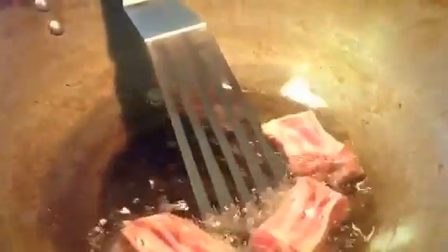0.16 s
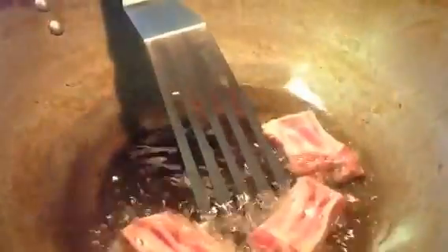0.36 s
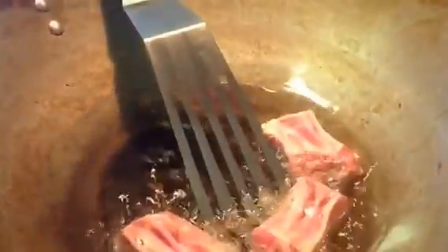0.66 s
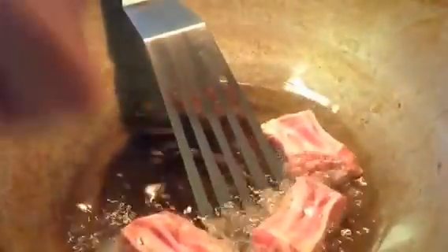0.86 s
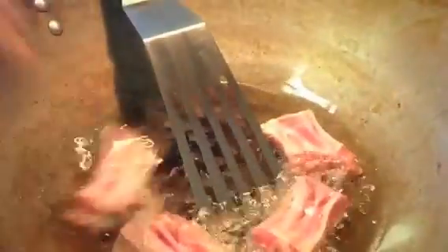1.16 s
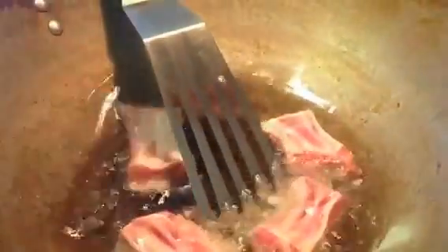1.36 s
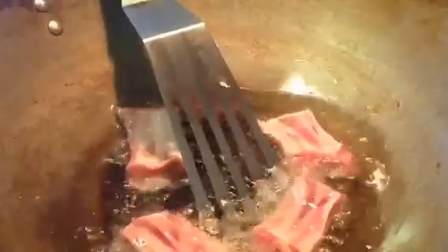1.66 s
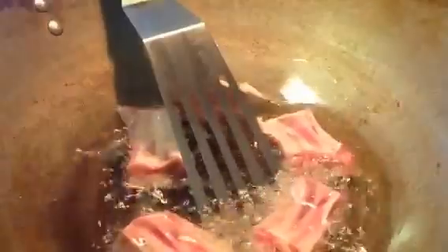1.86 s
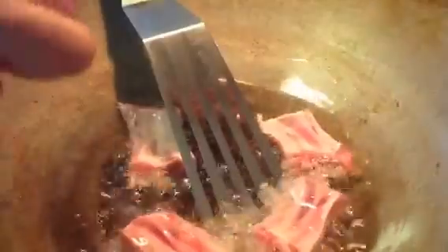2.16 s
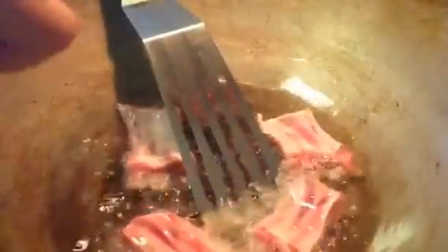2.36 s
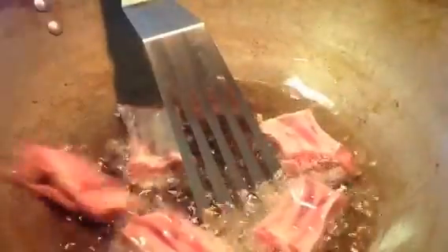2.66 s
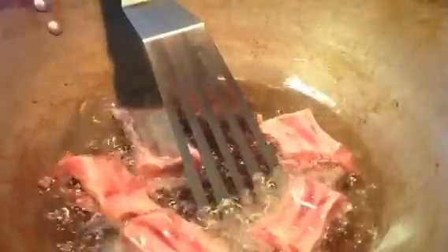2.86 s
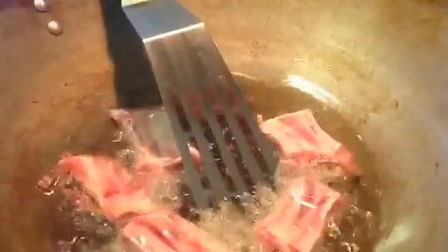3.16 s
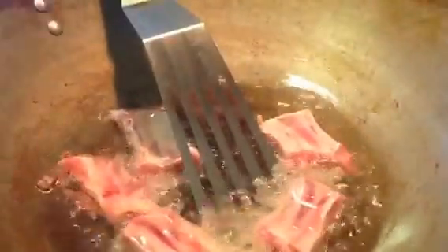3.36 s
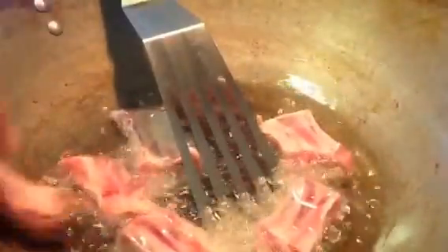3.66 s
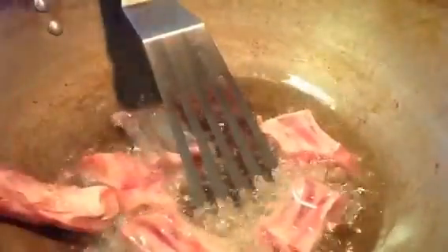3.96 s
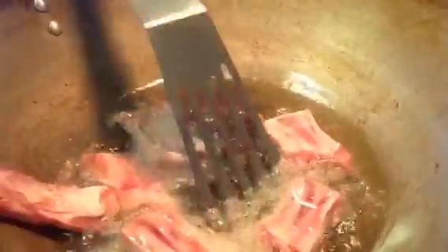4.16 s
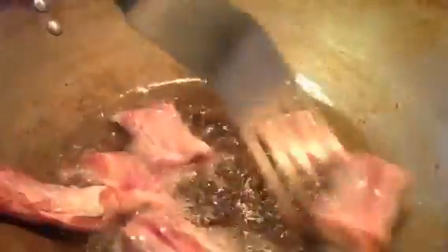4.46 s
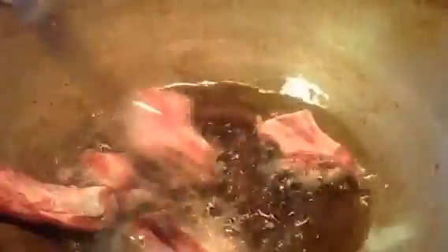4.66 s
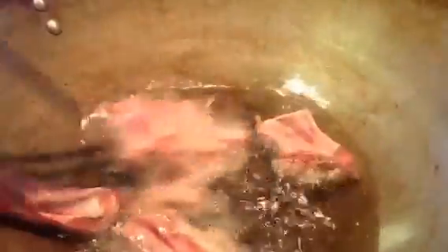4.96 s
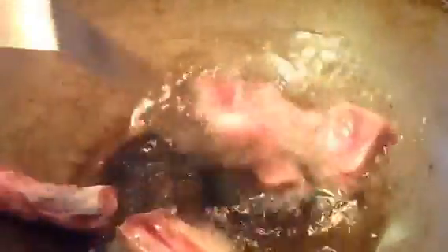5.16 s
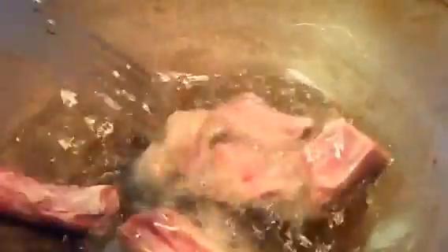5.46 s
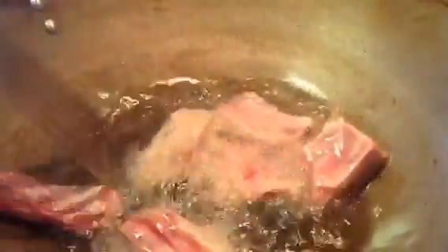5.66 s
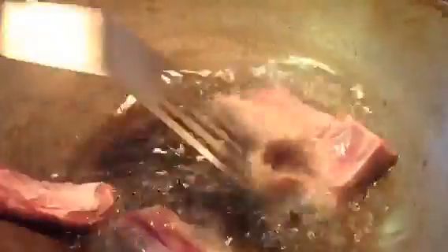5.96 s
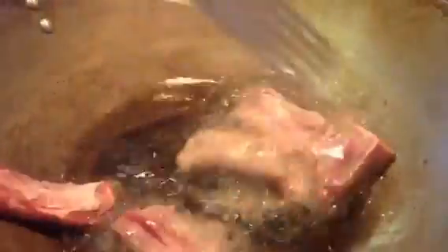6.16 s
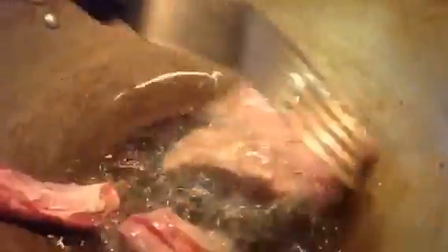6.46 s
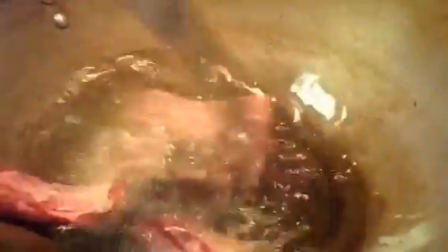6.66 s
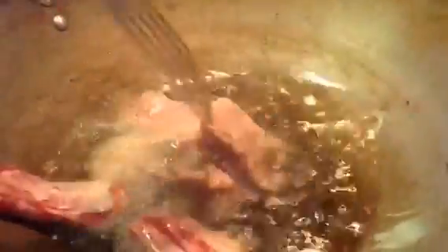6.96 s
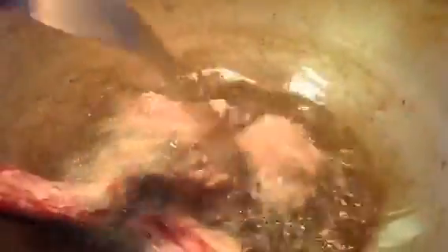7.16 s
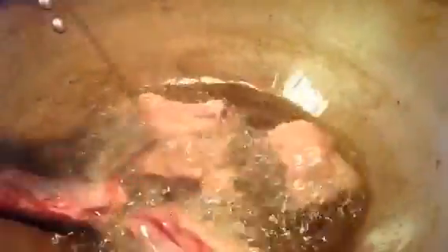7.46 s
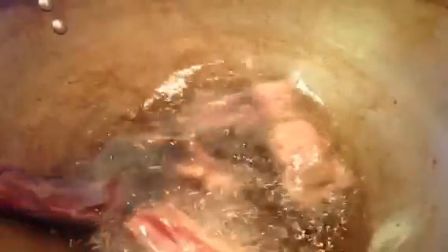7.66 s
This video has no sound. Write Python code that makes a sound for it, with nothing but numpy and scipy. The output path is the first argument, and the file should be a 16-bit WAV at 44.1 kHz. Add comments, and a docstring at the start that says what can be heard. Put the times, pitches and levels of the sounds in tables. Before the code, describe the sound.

Close, hissing sizzle of meat frying in a wok, with sharp spits, bubbling oil and a few dull spatula knocks and light scrapes.

```python
"""Pork ribs fry in a wok of hot oil, close to a mono microphone in a small kitchen.
Water from the meat boils off in countless tiny bursts, with squirts of steam and sharp spits.
More ribs go in and a spatula knocks and turns them; the frying grows louder and its bubbles larger.
The wok rings along, and the stove makes a low, steady rush underneath."""
import sys
import numpy as np
from scipy import signal
from scipy.fft import rfft, irfft
from scipy.io import wavfile

SR = 44100
rng = np.random.default_rng(int(sys.argv[2]) if len(sys.argv) > 2 else 0)


def wrap_up_sound(samples):
    """Save the sound to the file named by the first command line argument, as 16-bit audio."""
    columns = np.atleast_2d(samples).T
    # keep every value between -1 and 1, then stretch to whole-number steps
    tamed = np.clip(columns, -1, 1)
    steps = np.round(tamed * 32767).astype(np.int16)
    wavfile.write(sys.argv[1], SR, steps)


N = 344421

# how hard the meat fries as more goes in and is stirred: time_s, sizzle_db, coarse_db
FRYING_STRENGTH = [(0.0, -34.5, -44), (0.96, -38, -38), (1.41, -37.5, -35), (1.91, -34, -39.5),
                   (2.59, -32, -40.5), (3.52, -34.5, -35), (3.81, -28.5, -32), (4.18, -31, -36),
                   (4.44, -29.5, -36.5), (4.79, -31, -33), (5.05, -32, -24), (5.31, -28.5, -31),
                   (6.37, -28, -25.5), (6.48, -29.5, -25.5), (7.7, -26.5, -24.5), (7.81, -30, -19.5)]
# how far the meat has been stirred: time_s, share_0_to_1
STIRRED_SHARE = [(3.7, 0), (5.8, 1)]
# strength of the deep boiling under the meat: time_s, strength_db
BOILING_STRENGTH = [(0.0, -37.5), (0.24, -42.5), (3.8, -37), (4.3, -37.5), (6.2, -36.5), (6.7, -35),
                    (6.83, -38.5), (7.81, -37)]
# tone of five sizes of bubble, finest first (the sizzle has two): frequency_hz, gain_db
MIST_TONE = [(4000, -51), (8000, -5), (10500, -1), (12000, -2), (14500, -3), (16000, -19)]
SPRAY_TONE = [(1500, -57), (4000, 0), (7000, 6.5), (9000, 0), (10500, -4.5), (13000, -46), (16000, -46)]
RESTING_SIZZLE_TONE = [(1200, -29), (2800, -4.5), (3800, -3.5), (4350, 2.5), (5000, 2.5), (5800, 2.5),
                       (6500, -3), (8000, -17), (14000, -47)]
STIRRED_SIZZLE_TONE = [(1200, -35), (2800, -2), (3800, -1.5), (4350, 3), (5000, 1.5), (5550, -1),
                       (6500, -4), (8000, -13), (14000, -53)]
COARSE_TONE = [(500, -22.5), (900, -2.5), (1120, -6.5), (1380, 1), (1750, 1), (2100, 1), (2500, 1.5),
               (3200, 3.5), (4300, -1), (8000, -24)]
DEEP_TONE = [(100, -45), (295, -19), (340, -6.5), (390, -5.5), (480, -4), (570, -1), (640, -1), (740, -0.5),
             (830, -5), (1100, -4), (1220, -14.5), (1500, -11.5), (2500, -29)]
# wet meat meets hot oil and the hiss flares up: start_s, length_s, mist_db, spray_db, sizzle_db
HISS_FLARES = [(0.914, 0.09, -40, -36.5, -37), (1.16, 0.19, -36.5, -35.5, -35.5),
               (1.474, 0.21, -38.5, -41, -36.5), (2.685, 0.051, -46, -38, -38),
               (3.76, 0.054, -33, -29, -44), (4.163, 0.038, -38, -39, -41), (4.33, 0.2, -35, -34.5, -30.5),
               (4.606, 0.19, -36, -38.5, -58), (4.846, 0.19, -34, -34, -32.5),
               (5.094, 0.047, -33.5, -28.5, -29.5), (5.28, .15, -41, -41, -54),
               (5.673, 0.21, -42, -36, -31.5), (6.003, 0.12, -42, -37, -36),
               (6.415, 0.13, -34.5, -39, -31.5), (6.59, 0.1, -33.5, -31.5, -46),
               (6.816, 0.082, -39, -41, -30), (7.125, 0.2, -42, -50, -31), (7.56, 0.16, -42, -55, -43)]
# the frying dies down briefly: start_s, length_s, depth_db
FRYING_LULLS = [(0.413, 0.11, 0), (0.687, 0.17, 1), (0.997, 0.089, 4), (1.73, 0.2, 0.5), (3.166, 0.21, 2.5),
                (3.684, 0.064, 4), (4.56, 0.048, 1), (4.738, 0.041, 4.5), (4.964, 0.065, 3),
                (5.257, 0.048, 2), (5.48, 0.067, 0.5), (6.11, 0.21, 3), (6.337, 0.04, 3), (7.47, 0.08, 3)]
# tone of single droplets close by: frequency_hz, gain_db
CRACKLE_TONE = [(500, -25), (1500, -0.5), (3000, -10.5), (5500, -2), (9000, -7.5), (15000, -6)]
# the strongest jets of steam: start_s, level_db, pitch_hz, fade_s, width_share (of the pitch)
STEAM_SQUIRTS = [(0.062, -22.5, 5570, 0.0033, .2), (0.375, -29, 5600, .012, 0.31),
                 (0.378, -26.5, 2850, .004, 0.15), (0.871, -25.5, 5800, 0.0099, 0.16),
                 (1.139, -25, 5300, .003, .6), (1.614, -34, 4850, .0075, 0.65),
                 (1.644, -24, 4900, .006, 0.29), (1.68, -25.5, 3220, 0.0076, 0.54),
                 (1.703, -24, 5020, .0057, 0.54), (1.906, -31, 2520, 0.013, 0.22),
                 (1.906, -28.5, 4530, .007, .3), (1.968, -28, 4200, .008, .5),
                 (2.236, -25.5, 5030, 0.01, .3), (2.54, -20, 5100, 0.012, 0.33),
                 (2.579, -26.5, 5000, 0.012, 0.17), (2.715, -26, 3160, 0.0056, 0.18),
                 (2.732, -23.5, 5900, 0.016, 0.33), (2.806, -32, 2700, 0.0065, 0.22),
                 (2.831, -25.5, 4630, .005, .3), (3.044, -27, 3500, 0.011, 0.47),
                 (3.247, -28, 5570, 0.007, 0.34), (3.297, -26, 4800, 0.0062, 0.22),
                 (3.542, -29.5, 4500, .023, 0.23), (3.651, -26.5, 2680, 0.005, 0.95),
                 (3.774, -23, 5340, .006, 0.37), (3.871, -20.5, 4770, 0.0072, 0.19),
                 (4.376, -31, 4300, 0.006, .4), (4.472, -24, 3700, 0.008, .4),
                 (5.211, -24.5, 3600, 0.024, 0.7), (6.374, -16.5, 5140, 0.0076, 0.56),
                 (7.227, -24, 3000, 0.022, 0.91)]
# large bubbles of steam: start_s, level_db, pitch_hz
BUBBLE_POPS = [(1.748, -31.5, 1980), (2.0824, -24, 4360), (3.83, -23.5, 1940), (3.842, -29, 1900),
               (3.988, -30, 1610), (4.089, -27, 2710), (4.424, -31, 2030), (4.613, -25.5, 1880),
               (4.624, -29, 2150), (4.696, -29, 1750), (4.803, -27, 3060), (4.825, -27, 2420),
               (4.845, -26, 1680), (4.933, -26, 2270), (5.026, -27, 2260), (5.041, -29, 1700),
               (5.076, -28, 1640), (5.09, -27, 2210), (5.221, -29, 2020), (5.364, -28, 2070),
               (5.662, -25.5, 2670), (5.759, -28, 2080), (5.796, -24.5, 2920), (5.831, -29, 1710),
               (5.904, -23, 1900), (5.961, -24, 2750), (6.018, -25.5, 1970), (6.219, -30, 1580),
               (6.311, -23, 2470), (6.34, -26.5, 1540), (6.383, -24, 1670), (6.414, -26, 1980),
               (6.702, -26, 1860), (6.75, -25, 2550), (6.963, -25, 2430), (7.013, -21, 1780),
               (7.131, -29, 1360), (7.225, -30, 1900), (7.249, -25, 1960), (7.399, -29, 1900),
               (7.441, -25, 2500), (7.46, -29, 1605), (7.596, -28.5, 1500), (7.641, -23.5, 2500),
               (7.656, -27, 1740), (7.716, -23.5, 1960)]
# the loudest bursting drops: start_s, level_db, pitch_hz, spatter_db (against the crack), swell_cycles
WATER_SPITS = [(0.0645, -16, 5600, -20, .5), (0.383, -10.5, 5600, -10, 0.49), (0.802, -9, 10400, -14, .5),
               (1.1385, -10, 4870, -24, .4), (1.1478, -9.5, 4370, -14, 0.52), (1.24, -11.5, 7000, -11, 0.3),
               (1.3288, -7, 8040, -17, 0.46), (1.4461, -3, 7000, -19, 0.7), (1.515, -13, 11500, -22, 1.1),
               (1.5171, -6, 11500, -16, 0.45), (1.5203, -18, 12200, -20, 1.2),
               (1.6253, -10, 5570, -14, 0.46), (1.705, -16, 12500, -12, 1), (2.118, -12.5, 5600, -21, 0.66),
               (2.69, -17, 13100, -24, 1), (2.7443, -15.5, 7900, -5, 0.9), (2.75, -15, 9000, -13, 1),
               (3.0505, -12, 5400, -10, 0.49), (3.6532, -5, 4360, -15.5, .3),
               (3.7787, -7.5, 6560, -28, 0.58), (4.552, -4, 5770, -30, 0.88), (4.9022, -9, 5220, -28, .3),
               (5.319, -9, 6000, -28, 0.76), (5.3258, -9, 11000, -21, 1.7), (5.423, -11, 5940, -30, .5),
               (5.525, -6, 9300, -24, 1.2), (5.5285, -6.5, 4300, -7.5, 0.55), (5.5321, -5, 4260, -22, 0.45),
               (6.3772, -9, 7000, -9, 0.6), (6.3872, -5, 5380, -18, 0.56), (6.5173, -9, 6700, -15, 0.56),
               (6.592, -9.5, 7000, -30, 0.65), (6.8751, -13, 7000, -28, .5), (7.1431, -14, 9500, -11, .5)]
# meat and spatula hit the wok: start_s, level_db, pitch_hz, splash_db, tick_db, tick_hz
# (splash_db and tick_db are relative to the blow)
WOK_KNOCKS = [(0.398, -23, 720, -27, -20, 1800), (1.669, -18.5, 810, -22, -12, 1800),
              (2.1048, -9, 613, -12, -1, 2200), (2.9375, -17.5, 590, -10.5, -1, 1800),
              (3.4422, -9.5, 700, -28, -7, 2500), (3.6522, -26, 1000, -4.5, 2, 1800),
              (3.997, -22, 644, -17, -1, 1800), (4.2794, -12.5, 616, -7, 6, 2800),
              (4.383, -23, 650, -2, -4, 1800), (4.552, -17, 606, -29, -6, 3200),
              (4.726, -17, 645, -10, -12, 1760), (6.376, -17, 630, -8, -5, 1800),
              (6.555, -15, 940, -13, -6, 1800), (6.778, -18, 910, -32, -14, 1800)]
# pockets of steam under the meat: start_s, level_db, pitch_hz
STEAM_PLOPS = [(1.8235, -29, 614), (3.121, -20.5, 627), (3.473, -22, 644), (3.74, -32, 677),
               (3.86, -27, 640), (4.13, -35, 635), (7.3975, -23, 594)]
# spatula strokes: start_s, length_s, level_db, pitch_hz, width_share (of the pitch)
SPATULA_SCRAPES = [(6.292, 0.2, -35, 2450, .35), (6.55, 0.24, -37, 2477, .15),
                   (6.73, 0.18, -34.5, 1115, .12), (6.88, 0.22, -35.5, 1740, .2)]
# notes of the oil-damped wok: pitch_hz, gain_db, t60_s (a t60 is the time to fade by 60 dB)
WOK_NOTES = [(340, -3, .2), (378, -6, .18), (470, -6.5, .16), (528, .5, .16), (612, -1.5, .16),
             (644, 5.5, .16), (700, 1.5, .18), (732, 3, .15), (770, -1, .16), (840, -2.5, .16),
             (917, -1, .14), (1040, -2, .1), (1115, 1.5, .085), (1525, -5, .08), (1736, -1, .1),
             (1863, -.5, .08), (2116, 0, .06), (2477, .5, .045), (2747, -6, .08), (4370, -5.5, .012),
             (4955, -6, .025)]
# tone of the stove's rush: frequency_hz, gain_db
STOVE_TONE = [(20, -34), (55, -35), (70, -28), (88, -18), (100, -6), (125, -1), (150, 2.5), (200, 0.5),
              (260, -0.5), (295, -9), (350, -6.5), (600, -3), (1200, -1), (4000, -42.5)]


def frying():
    """Water boils off in five sizes of bubble, and the wok rings with the three larger ones."""
    mist = bubble_cloud(MIST_TONE, per_s=840, spread_db=7.5, clump_db=1, clumps_per_s=14, wash_db=4)
    spray = bubble_cloud(SPRAY_TONE, per_s=900, spread_db=0.5, clump_db=2, clumps_per_s=22, wash_db=-0.5)
    spray = unit(spray + amp(-9.5) * small_squirts(7400, 10400, spread_db=12, count=110))
    sizzle = sizzling()
    coarse = coarse_bubbling()
    deep = bubble_cloud(DEEP_TONE, per_s=350, spread_db=3, clump_db=1, clumps_per_s=20, wash_db=-6)
    # each size follows the frying by its own amount; hypot adds the power of the flares
    calm_db = -35
    rise_db = curve(FRYING_STRENGTH) - calm_db
    coarse_rise_db = curve(FRYING_STRENGTH, column=2) - calm_db
    mist_flare, spray_flare, sizzle_flare = flares()
    mist *= np.hypot(amp(-42.5 + 0.33 * rise_db), mist_flare)
    spray *= np.hypot(amp(-38 + 0.046 * rise_db), spray_flare)
    sizzle *= np.hypot(amp(-38 + 1.085 * rise_db), sizzle_flare)
    coarse *= amp(-36 + 0.55 * coarse_rise_db)
    deep *= amp(curve(BOILING_STRENGTH) - 2.5)
    larger = sizzle + coarse + deep
    return (mist + spray + larger) * lulls() + wok_ring(larger)


def sizzling():
    """Middle-sized bubbles sizzle; stirring the meat lowers their pitch."""
    resting = bubble_cloud(RESTING_SIZZLE_TONE, per_s=900, spread_db=4,
                           clump_db=1.5, clumps_per_s=20, wash_db=-10)
    resting = unit(resting + amp(-7) * small_squirts(3670, 5830, spread_db=14, count=130))
    turned = bubble_cloud(STIRRED_SIZZLE_TONE, per_s=1600, spread_db=3.6,
                          clump_db=1.2, clumps_per_s=20, wash_db=-7)
    stirred = curve(STIRRED_SHARE)
    return np.sqrt(1 - stirred) * resting + np.sqrt(stirred) * turned


def coarse_bubbling():
    """Bigger bubbles burst and ring among low jets of steam."""
    bursts = bubble_cloud(COARSE_TONE, per_s=1400, spread_db=3.2,
                          clump_db=1.2, clumps_per_s=28, wash_db=-5)
    rings = ringing_bubbles(1720, 3290, per_s=280, cycles=3.4, spread_db=4.5, rise=0.031)
    jets = small_squirts(1650, 3640, spread_db=12, count=150)
    return unit(bursts + amp(-6) * rings + amp(-12) * jets)


def bubble_cloud(tone, per_s, spread_db, clump_db, clumps_per_s, wash_db):
    """Bubbles of one size burst in clumps over a wash of ones too small to tell apart."""
    bursts = unit(scattered(clicks(per_s, spread_db)))
    wash = amp(wash_db) * rng.standard_normal(N)
    clumps = amp(clump_db * wander(clumps_per_s))
    return unit(shape_tone((bursts + wash) * clumps, tone))


def ringing_bubbles(low_hz, high_hz, per_s, cycles, spread_db, rise, pitches=20):
    """Bubbles ring for a few cycles, their pitch rising as they reach the surface."""
    out = np.zeros(N)
    for hz in np.geomspace(low_hz, high_hz, pitches):
        age = np.arange(2048) / SR * hz / cycles
        phase = 2 * np.pi * cycles * (age + rise * (age - 1 + np.exp(-age)))
        ring = age * np.exp(-2 * age) * np.sin(phase)
        heard = echo(ring, wok_db=2, wok_t60=0.09, room_db=-6, room_t60=0.1)
        out += signal.oaconvolve(clicks(per_s / pitches, spread_db), heard)[:N]
    return unit(out)


def flares(rise_s=0.023, fade_s=0.07):
    """Gains of mist, spray and sizzle: each flare rises, holds while the water lasts, and fades."""
    t, power = np.arange(N) / SR, np.zeros((3, N))
    for start_s, length_s, mist_db, spray_db, sizzle_db in HISS_FLARES:
        rise = np.clip((t - start_s) / rise_s, 0, 1)
        fade = np.exp(-np.maximum(t - start_s - length_s, 0) / fade_s)
        power += (amp([[mist_db], [spray_db], [sizzle_db]]) * rise * fade) ** 2
    return np.sqrt(power)


def lulls():
    """Gain of the frying: it sinks and recovers in each lull."""
    return amp(-sum(depth_db * arch(start_s, length_s) for start_s, length_s, depth_db in FRYING_LULLS))


def crackle():
    """Single droplets close by make dry ticks that stand out of the hiss."""
    return amp(-43.5) * unit(shape_tone(clicks(per_s=110, spread_db=3), CRACKLE_TONE))


def squirt(hz, fade_s, width_share=0.3, fizz_db=-11, sputter_depth=0.12):
    """Steam sputters through a small opening: a short, rough whistle with a little fizz."""
    t = np.arange(SR // 8) / SR
    steps = t[::40]
    sputter = np.interp(t, steps, np.clip(rng.standard_normal(len(steps)), -2, 2))
    jet = rng.standard_normal(len(t))
    whistle = resonate(resonate(jet, hz, width_share * hz), hz, width_share * hz)
    fizz = resonate(jet, 2 * hz, 1.4 * hz)
    steam = unit(whistle) + amp(fizz_db) * unit(fizz)
    age = t / fade_s
    swell = (1 - np.exp(-8 * age)) * np.exp(-age)
    burst = unit(steam * swell * np.exp(sputter_depth * sputter)) / unit(swell).max()
    return echo(burst, wok_db=-8, wok_t60=0.06, room_db=-12, room_t60=0.3)


def squirts():
    """The strongest jets of steam escape from under the meat."""
    out = np.zeros(N)
    for start_s, level_db, hz, fade_s, width_share in STEAM_SQUIRTS:
        add(out, start_s, amp(level_db) * squirt(hz, fade_s, width_share))
    return out


def small_squirts(low_hz, high_hz, spread_db, count):
    """Weaker jets of steam escape at random moments and pitches."""
    out = np.zeros(N)
    for when, pitch, size, length in rng.random((count, 4)):
        hz = low_hz * (high_hz / low_hz) ** pitch
        add(out, when * N / SR, amp(spread_db * size) * squirt(hz, fade_s=0.0041 + 0.001 * length))
    return unit(out)


def pops(cycles=5.5, rise=0.0073, splutter_db=-3):
    """A large bubble rings with a hollow note, rising as it opens, and splutters as it collapses."""
    out, t = np.zeros(N), np.arange(SR // 16) / SR
    for start_s, level_db, hz in BUBBLE_POPS:
        age = t * hz / cycles
        phase = 2 * np.pi * hz * t * (1 + rise * (np.tanh(age / 2) - 0.5))
        ring = (1 - np.exp(-5 * age)) * np.exp(-age) * np.sin(phase)
        splutter = resonate(spatter(t, t60=0.11, unevenness=0.4), hz, 0.35 * hz)
        burst = unit(ring) + amp(splutter_db) * unit(splutter)
        heard = echo(burst, wok_db=-3, wok_t60=0.07, room_db=-11, room_t60=0.25)
        # as much energy as 0.009 s of steady sound at level_db
        add(out, start_s, amp(level_db) * np.sqrt(0.009 * SR) * heard / np.linalg.norm(heard))
    return out


def gurgles():
    """Stirred meat traps steam that escapes in faint, low squirts."""
    jets = small_squirts(1650, 2800, spread_db=4, count=170)
    return amp(-40.5) * np.sqrt(curve(STIRRED_SHARE)) * jets


def spits():
    """A water drop explodes in the oil: a crack of a few cycles, then flying oil."""
    out, t = np.zeros(N), np.arange(SR // 8) / SR
    for start_s, level_db, hz, spatter_db, cycles in list(WATER_SPITS) + small_spits():
        shower = resonate(spatter(t, t60=0.09, unevenness=0.6), 1.06 * hz, width_hz=7200)
        burst = ping(t, hz, cycles) + amp(spatter_db) * shower
        add(out, start_s, amp(level_db) * echo(burst, wok_db=-6, wok_t60=0.05, room_db=-12, room_t60=0.3))
    return out


def small_spits(per_s=4, range_db=(-23, -16), range_hz=(5000, 10000), spatter_db=-19, cycles=0.4):
    """Weaker drops burst at random; gives rows like those of WATER_SPITS."""
    draws = rng.random((round(per_s * N / SR), 3))
    return [(when * N / SR, np.interp(size, [0, 1], range_db), np.interp(pitch, [0, 1], range_hz),
             spatter_db, cycles) for when, size, pitch in draws]


def spatter(t, t60, unevenness):
    """A shower of tiny droplets of uneven size dies away."""
    noise, size = rng.standard_normal((2, len(t)))
    return unit(noise * np.exp(unevenness * np.clip(size, -2, 2))) * amp(-60 * t / t60)


def knocks(cycles=0.96):
    """A blow ticks on the metal, sets the wok ringing and splashes the oil."""
    out, t = np.zeros(N), np.arange(SR // 8) / SR
    for start_s, level_db, hz, splash_db, tick_db, tick_hz in WOK_KNOCKS:
        blow = np.cos(2 * np.pi * hz * t) * np.exp(-hz * t / cycles)
        splash = resonate(spatter(t, t60=0.14, unevenness=0.094), hz=1400, width_hz=2000)
        splash *= 2 * amp(splash_db) / abs(splash).max()  # peaks 6 dB above splash_db
        tick = amp(tick_db) * ping(t, tick_hz, cycles=0.3)
        hit = echo(tick - blow + splash, wok_db=-6, wok_t60=0.047, room_db=-11, room_t60=0.1)
        add(out, start_s, amp(level_db) * hit)
    return through_wok(out)


def plops():
    """A pocket of steam opens under the meat with a soft, low note."""
    out, t = np.zeros(N), np.arange(SR // 16) / SR
    for start_s, level_db, hz in STEAM_PLOPS:
        note = echo(ping(t, hz, cycles=1), wok_db=-7, wok_t60=0.06, room_db=-12, room_t60=0.1)
        add(out, start_s, amp(level_db) * note)
    return through_wok(out)


def scrapes():
    """The spatula drags, and quick slips of its edge keep the wok ringing."""
    out, slips = np.zeros(N), clicks(per_s=570, spread_db=4)
    for start_s, length_s, level_db, hz, width_share in SPATULA_SCRAPES:
        ring = unit(wok_ring(resonate(slips, hz, width_share * hz)))
        out += amp(level_db) * arch(start_s, length_s) * ring
    return out


def wok_ring(x):
    """The wok's own notes ring along with whatever happens in it."""
    return sum(amp(db) * resonate(x, hz, np.log(1000) / np.pi / t60) for hz, db, t60 in WOK_NOTES)


def through_wok(x, ring_db=-4.5, low_cut_hz=360):
    """A low sound in the oil sets the wok ringing; the small pan gives off no bass."""
    low_cut = signal.butter(4, low_cut_hz, "high", fs=SR, output="sos")
    return signal.sosfilt(low_cut, x + amp(ring_db) * wok_ring(x))


def stove():
    """The stove makes a low, even rush, with the wok ringing on top of it."""
    rush = shape_tone(rng.standard_normal(N), STOVE_TONE, size=16384)
    return amp(-43) * unit(rush + 0.8 * wok_ring(rush))


def echo(x, wok_db, wok_t60, room_db, room_t60):
    """A sound arrives directly, then off the wok's walls, then from around the room."""
    t = np.arange(SR // 4) / SR
    wok, room = rng.standard_normal((2, len(t)))
    wok *= amp(-60 * t / wok_t60) * (t > 0.0008)
    room *= amp(-60 * t / room_t60) * (t > 0.006)
    paths = (t == 0) + amp(wok_db) * wok / np.linalg.norm(wok) + amp(room_db) * room / np.linalg.norm(room)
    return signal.oaconvolve(x, paths)


def scattered(x, spots=12):
    """Each click comes from one of several spots in the wok, each with its own echoes."""
    spot = rng.integers(0, spots, N)
    return sum(echo(x * (spot == k), wok_db=-1, wok_t60=0.057, room_db=-16, room_t60=0.22)[:N]
               for k in range(spots))


def clicks(per_s, spread_db):
    """Randomly timed clicks: many small, a few large."""
    size = amp(spread_db * np.minimum(rng.exponential(1, N), 4))
    return size * rng.choice([-1, 1], N) * (rng.random(N) < per_s / SR)


def ping(t, hz, cycles):
    """A tone that swells for so many cycles, then dies away; its peak is 1."""
    age = t * hz / cycles
    tone = age * np.exp(-age) * np.sin(2 * np.pi * hz * t)
    return tone / abs(tone).max()


def shape_tone(x, tone, size=4096):
    """Filters by a tone table. Nothing rings ahead of a click, so its front stays sharp."""
    hz, db = np.transpose(tone)
    bins_hz = abs(np.fft.fftfreq(size, 1 / SR))
    log_gain = np.log(amp(np.interp(np.log(bins_hz + 1), np.log(hz), db)))
    taps = np.fft.ifft(np.exp(np.conj(signal.hilbert(log_gain)))).real
    return signal.oaconvolve(x, taps[:size // 2])[:len(x)]


def resonate(x, hz, width_hz):
    """Keeps a band around one pitch; a narrower band rings longer."""
    hz = min(hz, SR / 3)
    return signal.lfilter(*signal.iirpeak(hz, hz / min(width_hz, SR / 4), fs=SR), x)


def wander(per_s):
    """A smooth random drift that changes about per_s times a second."""
    hz = np.fft.rfftfreq(N, 1 / SR)
    slow_band = np.exp(-(hz / per_s) ** 2) * hz / (hz + per_s / 4)
    return unit(irfft(rfft(rng.standard_normal(N)) * slow_band, N))


def arch(start_s, length_s):
    """Rises from 0 to 1 and falls back, once."""
    return np.sin(np.pi * np.clip((np.arange(N) / SR - start_s) / length_s, 0, 1))


def curve(rows, column=1):
    """One column of a time table, sample by sample."""
    rows = np.asarray(rows)
    return np.interp(np.arange(N) / SR, rows[:, 0], rows[:, column])


def amp(db):
    """Turns decibels into a gain."""
    return 10 ** (np.asarray(db) / 20)


def unit(x):
    """Scales a sound to an average power of 1."""
    return x / np.sqrt(np.mean(x ** 2) + 1e-20)


def add(mix, start_s, sound):
    """Mixes a sound in at start_s."""
    part = mix[max(0, round(start_s * SR)):][:len(sound)]
    part += sound[:len(part)]


def scene():
    """Everything reaches one microphone, so both channels are the same."""
    food = frying() + crackle() + squirts() + pops() + gurgles() + spits()
    mono = food + knocks() + plops() + scrapes() + stove()
    return np.array([mono, mono])


def record(dry, low_cut_hz=78, high_cut_hz=15450):
    """The recorder cuts the deepest bass and the highest treble."""
    low_cut = signal.butter(2, low_cut_hz, "high", fs=SR, output="sos")
    high_cut = signal.firwin(601, high_cut_hz, window=("kaiser", 9), fs=SR)
    return signal.oaconvolve(signal.sosfilt(low_cut, dry), high_cut[None], "same")


dry = scene()
out = record(dry)
wrap_up_sound(out)
```